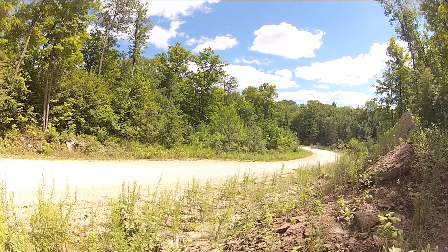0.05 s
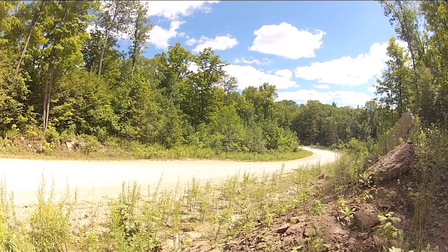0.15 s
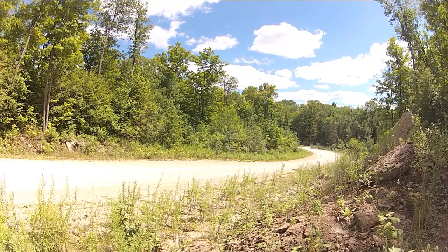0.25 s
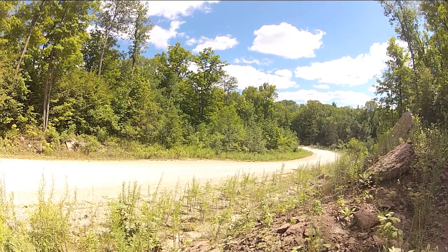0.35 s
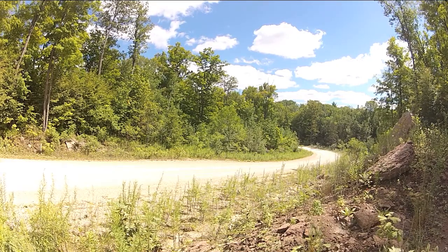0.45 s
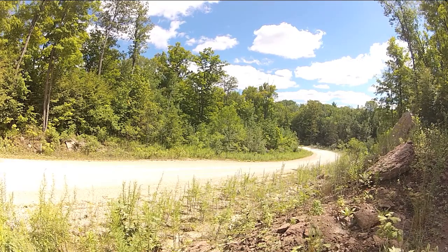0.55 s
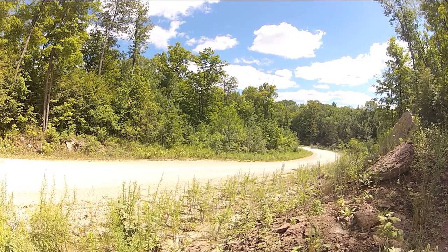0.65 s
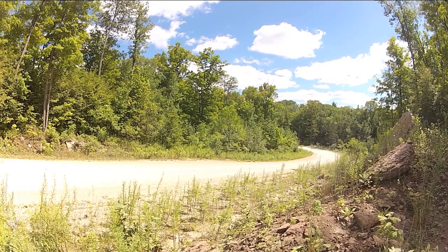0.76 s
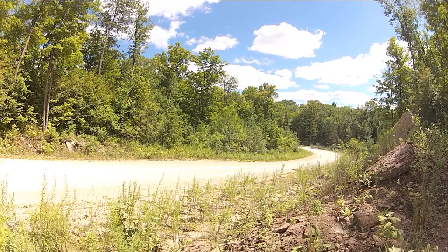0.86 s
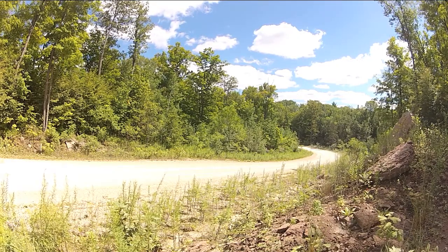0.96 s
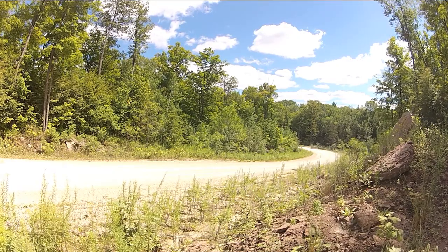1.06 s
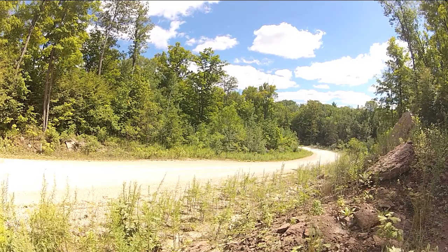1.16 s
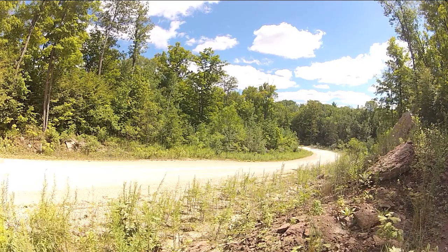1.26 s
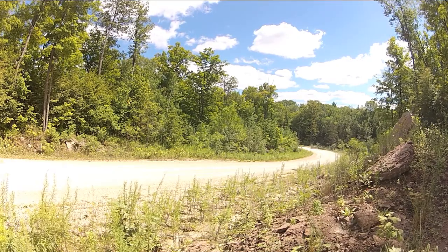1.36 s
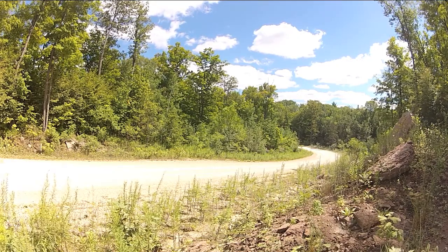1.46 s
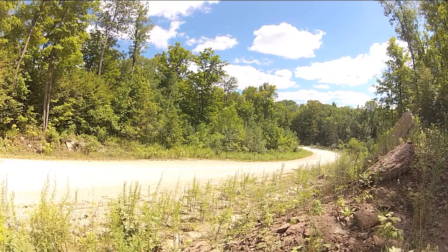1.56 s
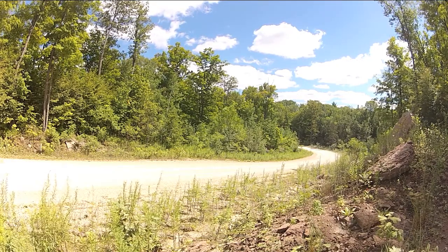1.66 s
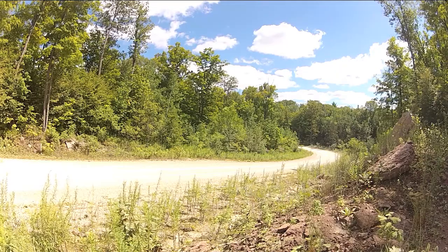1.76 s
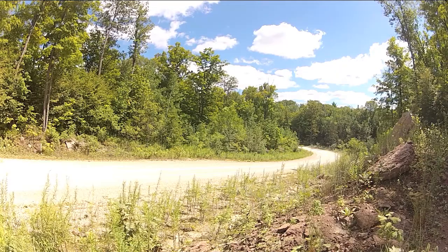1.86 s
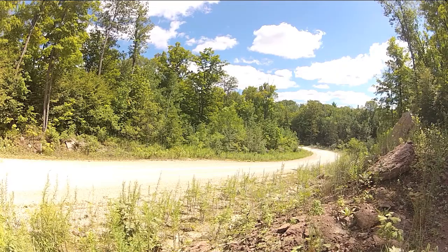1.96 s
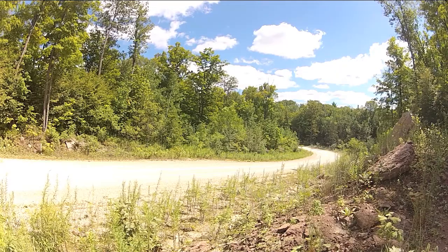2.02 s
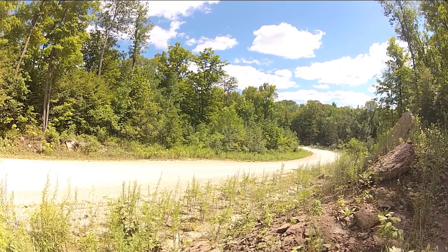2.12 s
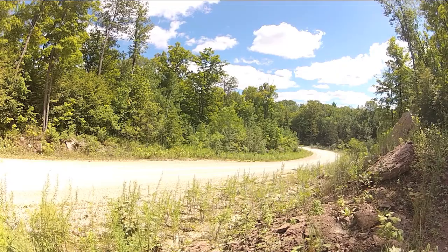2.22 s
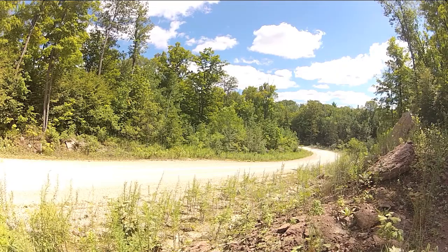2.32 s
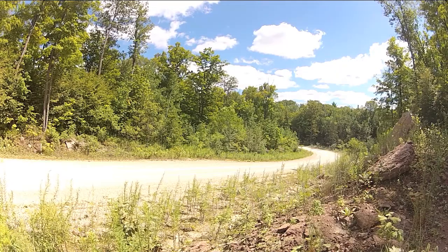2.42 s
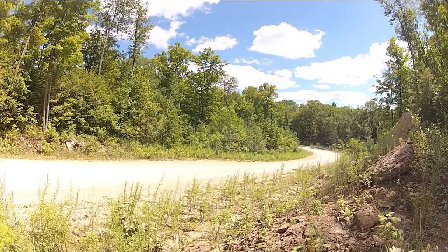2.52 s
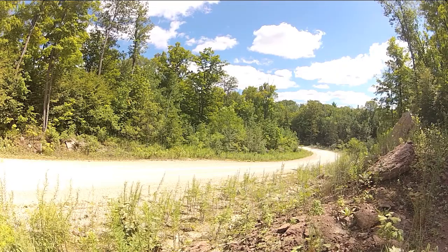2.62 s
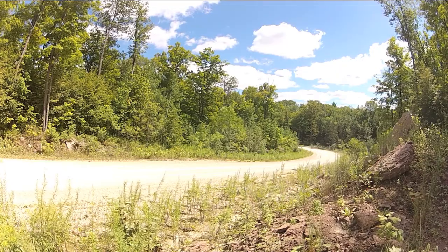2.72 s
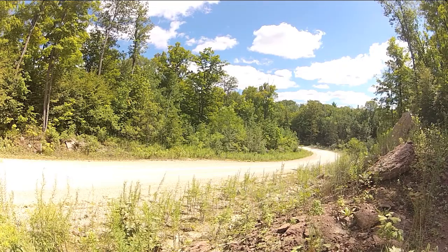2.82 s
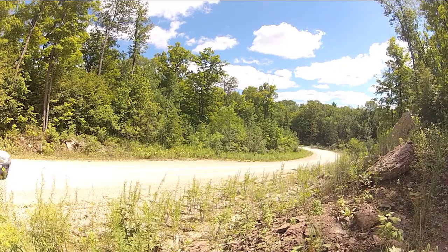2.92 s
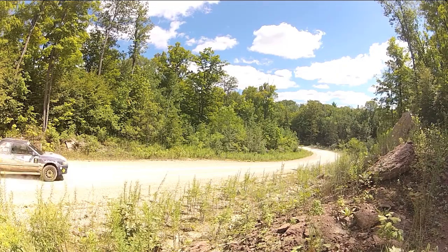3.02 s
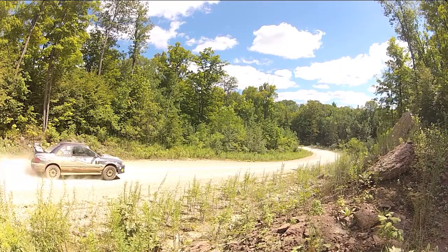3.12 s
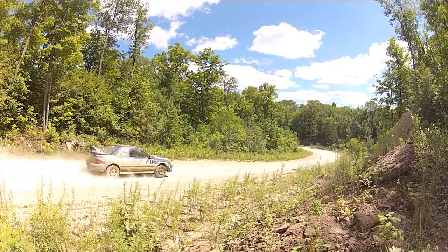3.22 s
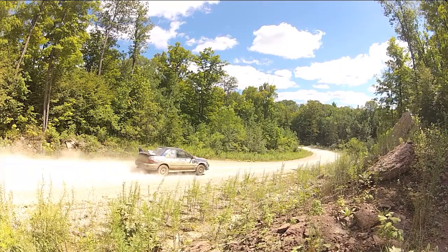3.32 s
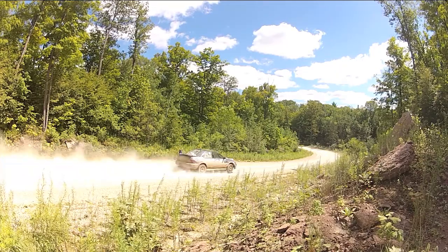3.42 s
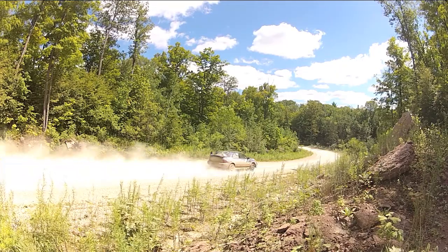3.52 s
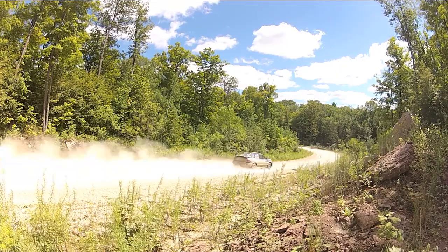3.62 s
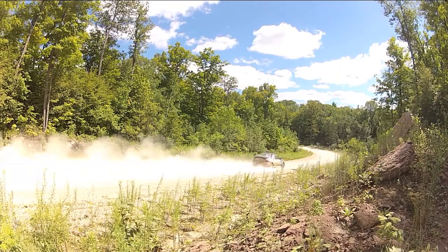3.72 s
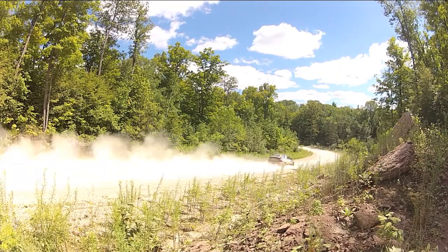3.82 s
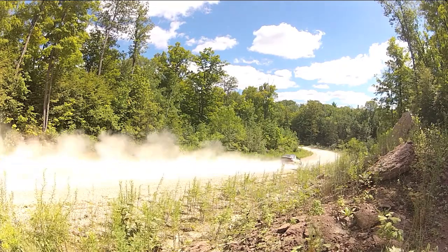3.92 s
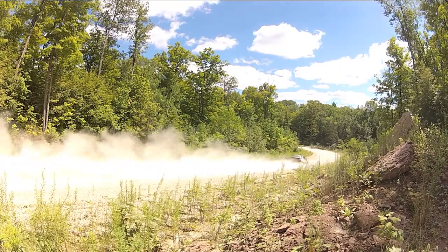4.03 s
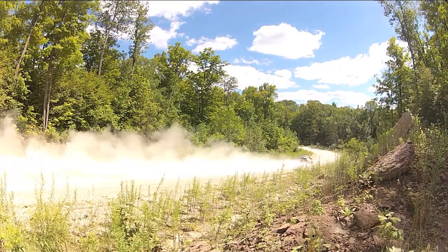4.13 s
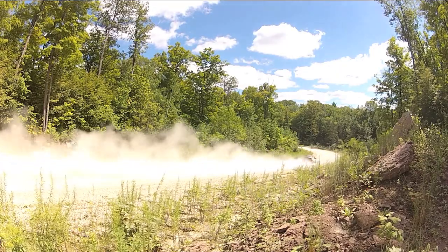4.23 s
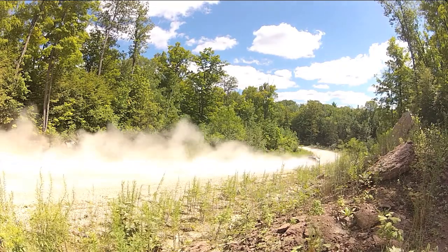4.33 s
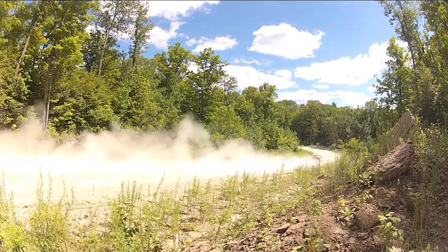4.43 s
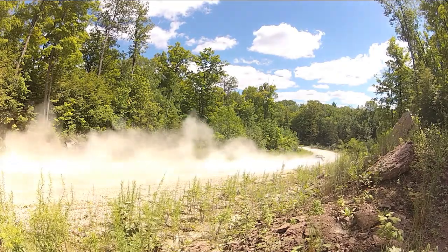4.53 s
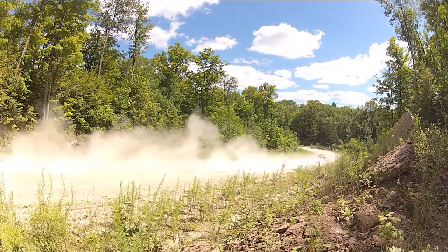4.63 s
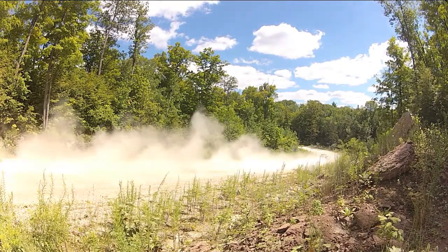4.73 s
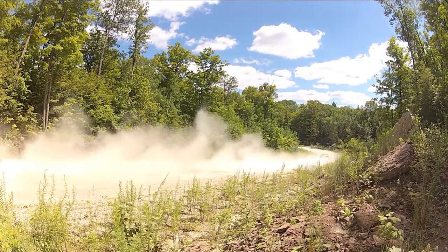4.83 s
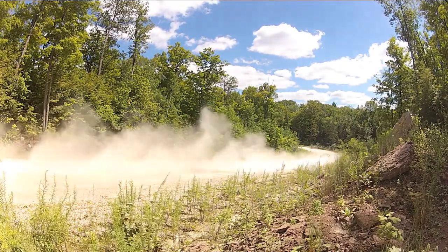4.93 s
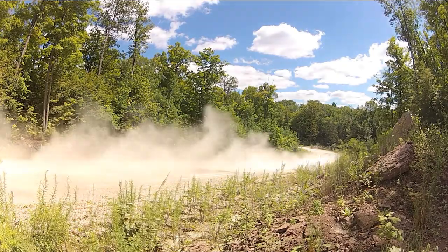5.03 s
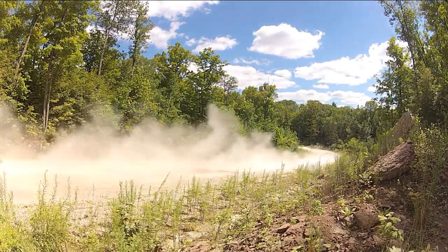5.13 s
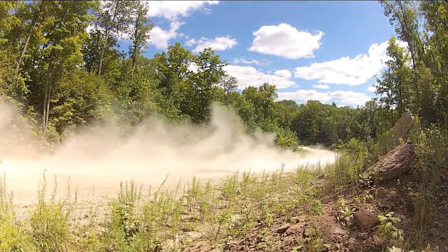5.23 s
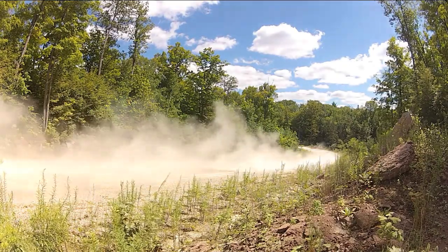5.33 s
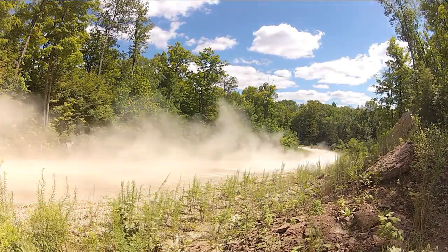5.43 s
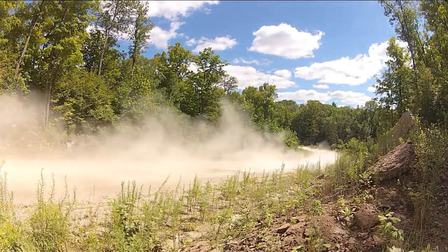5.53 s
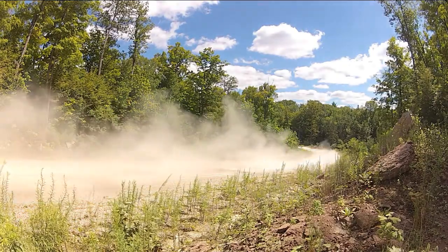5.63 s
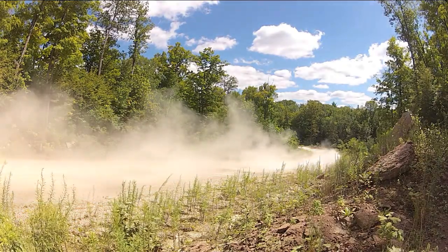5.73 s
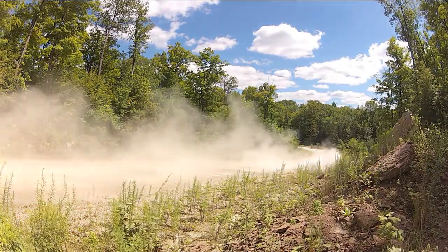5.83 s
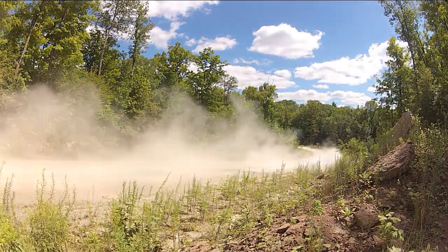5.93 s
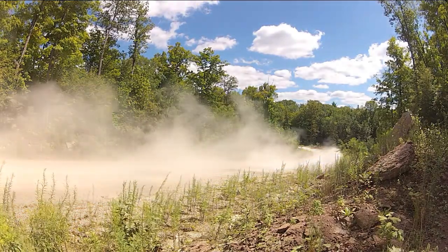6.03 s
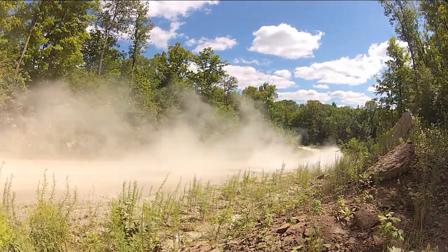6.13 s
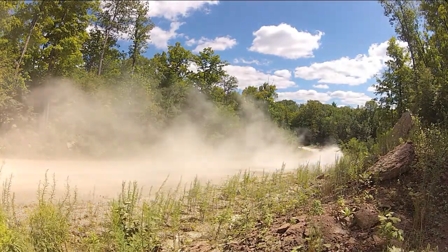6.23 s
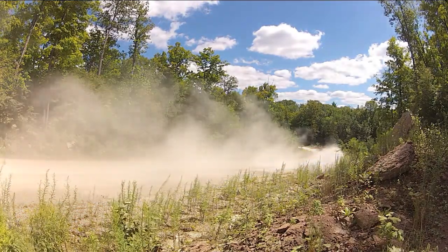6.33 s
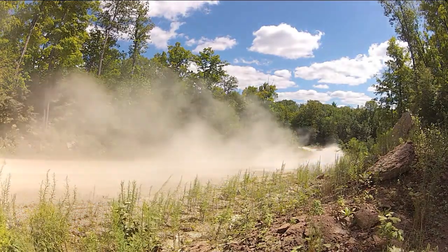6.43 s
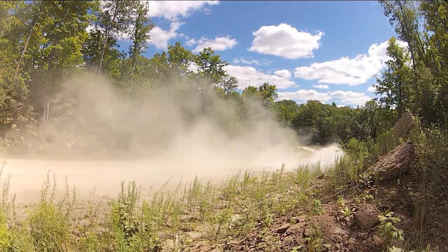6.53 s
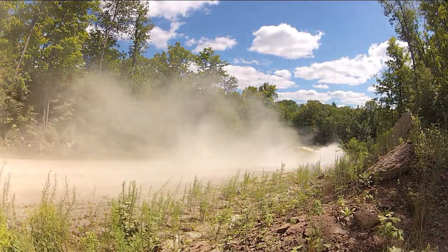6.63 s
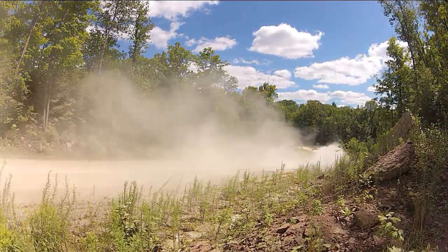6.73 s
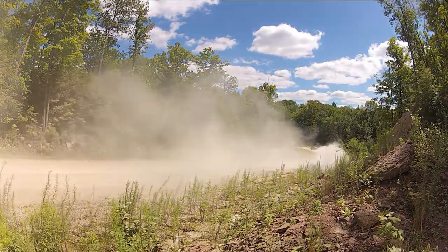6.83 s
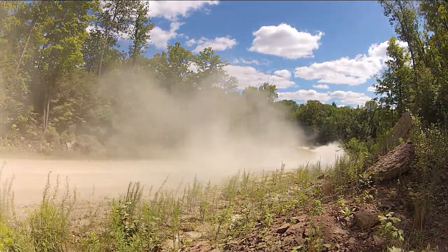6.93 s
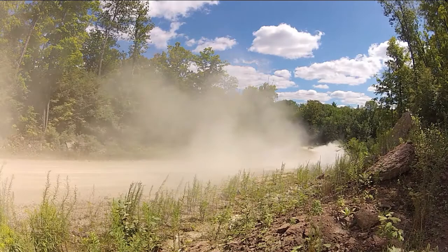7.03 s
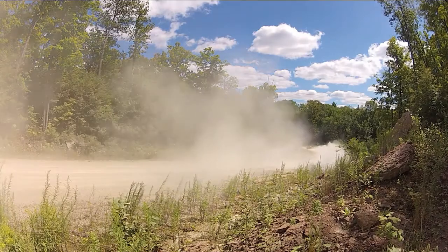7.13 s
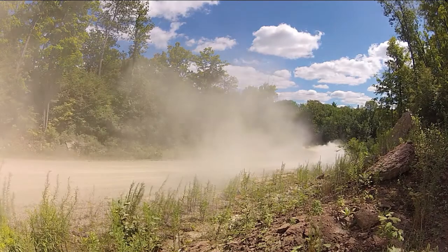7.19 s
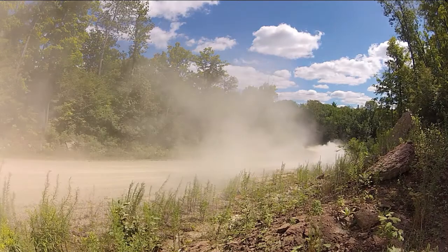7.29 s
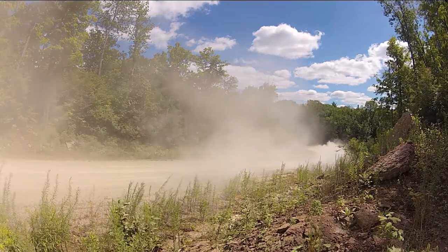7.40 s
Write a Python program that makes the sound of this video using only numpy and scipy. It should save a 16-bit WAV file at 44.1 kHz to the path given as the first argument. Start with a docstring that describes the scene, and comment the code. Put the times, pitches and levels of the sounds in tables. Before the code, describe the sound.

A four-cylinder rally car approaches along a gravel forest road, its distant engine note dipping, then growing into a deep boom. It goes to full throttle and passes close to the roadside microphone, tyres churning gravel and exhaust crackling harshly. The driver lifts off, and the exhaust burbles and spits. The engine falls in pitch as it recedes, giving one more short burst before fading toward the soft hush of the trees.

```python
"""A four-cylinder rally car comes up a gravel forest road, its exhaust booming at the rate the cylinders
fire and barking in pulses that the trees scatter. At about 2 s it goes to full throttle, tyres churning
gravel, and near 3 s it passes close; the camera adds a thin whine to the loud bass. The tailpipe now faces
us and cracks, one cylinder louder than the rest. Just before 4 s the driver lifts off and the exhaust
burbles and spits. The car drives away into the hush of the trees, with one more burst near 6 s."""
import sys
import numpy as np
from scipy import signal
from scipy.fft import rfft, irfft, next_fast_len
from scipy.io import wavfile
from scipy.ndimage import uniform_filter1d, map_coordinates

SR = 44100
rng = np.random.default_rng(int(sys.argv[2]) if len(sys.argv) > 2 else 0)


def to_wav(s):
    """Save 16-bit WAV."""
    ch = np.atleast_2d(s).T  # columns
    pcm = np.round(np.clip(ch, -1, 1) * 32767)  # PCM
    wavfile.write(sys.argv[1], SR, pcm.astype(np.int16))


N = 328981
TIME = np.arange(N) / SR
FREQS = np.fft.rfftfreq(N, 1 / SR)
CUTOFF_HZ = 15500


def amp(db):
    """Turns decibels into a number to multiply by."""
    return 10 ** (np.asarray(db) / 20)


def unit(x):
    """Scales a sound so its average strength (rms) is 1."""
    return x / np.sqrt(np.mean(x ** 2) + 1e-20)


def steady(x, span_s=0.2):
    """Evens out slow changes in loudness, holding the strength near 1."""
    size = max(int(span_s * SR), 64)
    return x / np.sqrt(abs(uniform_filter1d(uniform_filter1d(x ** 2, size), size)) + 1e-12)


def curve(rows):
    """Joins (time, value) points with straight lines."""
    return np.interp(TIME, *np.transpose(rows))


def colour(x, points):
    """Shapes a sound's tone with (pitch_hz, gain_db) points."""
    size = next_fast_len(N)
    hz, db = np.transpose(points)
    gain = amp(np.interp(np.log(np.fft.rfftfreq(size, 1 / SR) + 1), np.log(hz), db))
    return irfft(rfft(x, size) * gain, size)[:N]


def wander(rate_hz):
    """A smooth random wobble of strength 1, up to about the given rate."""
    knots = rng.standard_normal(8192)
    return unit(map_coordinates(knots, [TIME * 2 * rate_hz], order=2, mode="wrap"))


def blend(a, b, share):
    """Mixes two sounds; share is the part of the power that a gets."""
    share = np.clip(share, 0, 1)
    return np.sqrt(share) * a + np.sqrt(1 - share) * b


def decay(x, seconds):
    """Gives every click a fading tail."""
    return signal.lfilter([1], [1, -np.exp(-1 / (seconds * SR))], x)


def gate(start, end, rise_s, fall_s):
    """1 between two moments and 0 outside, with straight ramps."""
    return np.clip(.5 + np.minimum((TIME - start) / rise_s, (end - TIME) / fall_s), 0, 1)


def bump(s, half_s):
    """A smooth rise to 1 and back around one moment."""
    return np.exp(-((TIME - s) / half_s) ** 2)


# How fast the cylinders fire as the car comes, passes and leaves: time_s, firing_hz
FIRING_RATE = [(0, 213.4), (.25, 213), (.33, 217.9), (.49, 221.2), (.9, 197.9), (1.09, 188.3), (1.16, 172),
               (1.28, 162.4), (1.55, 178.5), (1.7, 174.2), (1.87, 184.9), (2.28, 184.2), (2.42, 189.6),
               (2.64, 189.1), (2.92, 193.6), (3.1, 193.7), (3.2, 192.5), (3.45, 192.5), (3.75, 190.6),
               (3.775, 175.7), (3.9, 178), (4, 184.4), (4.18, 182.9), (4.35, 173.5), (4.52, 160.6),
               (5.05, 143.1), (5.17, 133.7), (5.42, 137), (5.7, 146.4), (6.22, 157.4), (6.32, 145.6),
               (6.6, 141.1), (7.46, 126.5)]

def crank(waver=.002, strong_s=3.4155):
    """Counts the engine's firings; every fourth is the cylinder that cracks loudest."""
    count = np.cumsum(curve(FIRING_RATE) * (1 + waver * wander(18))) / SR
    return count - np.interp(strong_s, TIME, count)


# When the pedal is right down: start_s, end_s, build_s
FULL_THROTTLE = [(2.053, 3.756, 0.31), (5.905, 6.235, .04)]

def drive_past(closest_s=3.08, speed_m_per_s=23.3, closest_m=13.6, swing_s=0.13, reach_m=34.6):
    """Four 0-1 controls: throttle, being past us, tailpipe beaming at us, sound arriving directly."""
    throttle = sum(gate(start, end, build_s, fall_s=0.012) for start, end, build_s in FULL_THROTTLE)
    metres = np.hypot(closest_m, speed_m_per_s * (TIME - closest_s))
    past = .5 + .5 * np.tanh((TIME - closest_s) / (2 * swing_s))
    in_reach = 1 / (1 + (metres / reach_m) ** 4)
    facing = past * in_reach * (0.17 + 0.79 * throttle)  # the pipe beams backwards, most on throttle
    in_view = gate(2, 6.24, rise_s=0.37, fall_s=0.37)  # clear of the trees between two bends
    direct = in_view * (0.73 * (closest_m / metres) ** 0.3 + 0.14 * facing)
    return throttle, past, np.clip(facing, 0, 1), np.clip(direct, 0, 1)


# Base loudness of the exhaust's deep tone: time_s, level_db
BOOM_LEVEL = [(0, -32.5), (.27, -38), (.36, -45.5), (.9, -44), (1.3, -33.5), (1.5, -20.5), (1.66, -16),
              (1.8, -19.5), (2.25, -19), (2.72, -11), (3, -10.5), (3.14, -16.5), (3.7, -19), (4.5, -26),
              (5.1, -23), (5.88, -25.5), (5.94, -17.5), (6.19, -18.5), (6.3, -34), (6.56, -28.5),
              (7.46, -34.5)]
# Brief dips and swells as the car moves among the trees: time_s, half_length_s, change_db
TREE_SWELLS = [(1.39, 0.029, 2), (1.453, .018, -10), (1.785, 0.016, -5), (1.98, .03, -5),
               (2.038, 0.015, 8.5), (2.102, .04, -0.5), (5.118, 0.062, 1.5), (5.194, .03, -4)]

def boom(count, direct, facing, past, flutter_coming=0.26, flutter_going=0.19):
    """The pipe's deep tone and its octave, which is beamed backwards; echoes make both flutter."""
    far = np.sqrt(1 - direct)
    deep_db = curve(BOOM_LEVEL) + sum(db * bump(s, half_s) for s, half_s, db in TREE_SWELLS)
    octave_db = deep_db - 13 - 3 * past + 11 * facing
    flutter = far * (flutter_coming * (1 - past) + flutter_going * past)
    out = np.zeros(N)
    for multiple, level_db in enumerate([deep_db, octave_db], 1):
        tone = -np.cos(multiple * (2 * np.pi * count + .2 * far * wander(12)))
        out += amp(level_db) * unit(tone * (1 + multiple * flutter * wander(14)))
    return out


# The tones in the throb: multiple_of_firing_rate, relative_db, extra_when_facing_db
THROB_TONES = [(.25, -21, 17.5), (.5, -1, -5), (.75, 2.5, -2), (1.25, -2, 3), (2.25, -9, 9),
               (2.5, -4.5, -13), (3.25, -11.5, 13), (3.5, -3, -19)]

def throb(count, direct, facing, level_db):
    """Unequal cylinders add tones at quarter steps of the firing rate, blurred by echoes."""
    far = .7 * np.sqrt(1 - direct)
    tones = np.zeros(N)
    for multiple, db, facing_db in THROB_TONES:
        sway = 1 + far * (wander(15) + 1j * wander(6.6))  # wobbles both loudness and timing
        tones -= amp(db + facing_db * facing) * (sway * np.exp(2j * np.pi * multiple * count)).real
    return amp(level_db) * steady(tones)


# The four cylinders in firing order: pulse_db, shock_db, jet_db, lateness_in_firings
CYLINDERS = [(1, 2.5, 0, -0.013), (-4.5, -13.5, -9.5, 0.0029), (6.5, -4.5, -15, 0.012),
             (2, -6, -22, -0.0023)]

def firings(count, part, scatter_db, jitter=0.0092):
    """One click a firing for the pulse, shock or jet; cylinder and chance set its size and timing."""
    pulse_db, shock_db, jet_db, lateness = np.transpose(CYLINDERS)
    cylinder_db = {"pulse": pulse_db, "shock": shock_db, "jet": jet_db}[part]
    number = np.arange(np.ceil(count[0]) + 1, count[-1] - 1).astype(int)
    cylinder = number % len(CYLINDERS)
    loud, late = rng.standard_normal((2048, 2))[:len(number)].T
    at = np.interp(number + lateness[cylinder] + jitter * late, count, np.arange(N))
    clicks = np.zeros(N)
    clicks[np.round(at).astype(int)] = amp(cylinder_db[cylinder] + scatter_db * loud)
    return clicks


def forest(x, ring_s=0.74, echoes_per_s=2000):
    """Trunks and leaves scatter the sound into many small, dying echoes."""
    echoes = rng.standard_normal(SR) * (rng.random(SR) < echoes_per_s / SR)
    fade = amp(-60 * TIME[:SR] / ring_s)
    return steady(signal.fftconvolve(x, echoes * fade)[:N])


# Tone of the bark's low body: pitch_hz, gain_db
BODY_TONE = [(210, -50), (260, -8), (310, -17), (385, -2.5), (440, 2.5), (490, -1), (575, 3), (650, -3.5),
             (740, -12), (900, -43)]
# Tone of the bark's higher, harder edge: pitch_hz, gain_db
EDGE_TONE = [(520, -74), (620, -1.5), (690, 1.5), (780, 5), (960, 1.5), (1150, -5.5), (1400, -14),
             (1800, -24), (2600, -57)]

def bark(count, direct, body_db, edge_db, puff_s=0.0069, flutter_db=1.46):
    """Pressure pulses and swirling puffs leave the tailpipe, heard directly and, rougher, off the trees."""
    roughness = 0.53 * (1 - direct) ** 1.3
    out = np.zeros(N)
    for tone, level_db, part in [(BODY_TONE, body_db, "pulse"), (EDGE_TONE, edge_db, "shock")]:
        pulses = -firings(count, part, scatter_db=0.8)
        puffs = decay(pulses, puff_s) * rng.standard_normal(N)
        straight, scattered, swirling = (steady(colour(x, tone)) for x in (pulses, forest(pulses), puffs))
        arriving = blend(straight, scattered, direct)
        wobble_db = flutter_db * (1 - direct) * wander(8.7)
        out += amp(level_db + wobble_db) * steady(blend(swirling, arriving, roughness))
    return out


# Base loudness of the tyre and air rumble: time_s, level_db
RUMBLE_LEVEL = [(0, -43), (1.1, -39), (1.9, -28), (2.92, -25.5), (3.16, -41), (3.75, -34), (4.15, -33),
                (4.85, -38), (7.46, -43)]
# Tone of that rumble: pitch_hz, gain_db
RUMBLE_TONE = [(20, -31), (40, -12.5), (60, -15), (100, -6), (160, -3), (250, -10.5), (400, -9),
               (800, -49.5)]
# A steady hum far away: pitch_hz, level_db
DISTANT_HUM = [(64.6, -44)]

def rumble(swell_db, boost_db=2):
    """Low roar of tyres and air, over a steady distant hum."""
    noise = unit(colour(rng.standard_normal(N), RUMBLE_TONE))
    road = amp(curve(RUMBLE_LEVEL) + swell_db + boost_db) * noise
    hum_hz, hum_db = DISTANT_HUM[0]
    hum = np.sin(2 * np.pi * hum_hz * TIME + .25 * wander(3.8))
    return road + amp(hum_db) * unit(hum)


# Tone of the forest's hush: pitch_hz, gain_db
HUSH_TONE = [(200, -23), (520, -0.5), (950, 2), (1400, -11.5), (2500, -23), (6000, -38), (15000, -55)]

def hush(level_db=-52):
    """The soft, steady noise of the trees, heard when the car is far."""
    return amp(level_db) * unit(colour(rng.standard_normal(N), HUSH_TONE))


# Tone of churned gravel, also used for the exhaust's spits: pitch_hz, gain_db
GRIT_TONE = [(500, -27), (1100, 1), (1500, 1.5), (2200, 0), (3400, -3), (4700, -6), (6500, -9.5),
             (9500, -12), (12500, -13), (14000, -17), (15300, -31)]

def gravel(count, stones_per_s=700, spread_db=2.5, stone_s=0.0014, pulsing=0.039):
    """Stones tick under the tyres in a wash of grit and exhaust hiss that pulses with the engine."""
    sizes = amp(spread_db * np.minimum(rng.exponential(1, N), 4))
    hits = sizes * (rng.random(N) < stones_per_s / SR)
    stones = unit(decay(hits, stone_s) * rng.standard_normal(N))
    wash = unit(rng.standard_normal(N) * (1 + pulsing * np.cos(2 * np.pi * count)))
    return unit(colour(blend(stones, wash, share=0.3), GRIT_TONE))


# Base loudness of the exhaust and gravel roar; bark and throb follow it too: time_s, level_db
ROAR_LEVEL = [(0, -43), (.48, -40), (.91, -51.5), (1.14, -45.5), (1.31, -47.5), (1.58, -38.5), (1.85, -38),
              (2.16, -32.5), (2.66, -26), (2.99, -29), (3.47, -23.5), (3.745, -29), (3.78, -34.5),
              (4.1, -44), (5.13, -56.5), (5.85, -56.5), (5.98, -51), (6.94, -58.5)]
# How a long way through the air changes the tone: pitch_hz, gain_db
FAR_TONE = [(1200, 1), (2200, 2.5), (3500, -0.5), (7000, 2.5), (12000, 0), (15000, -10)]

def rasp(count, facing, boost_db=1, near_db=-45, fade_db=10):
    """Gravel, plus crack when the pipe faces us; the fainter they are, the more top treble the air takes."""
    level_db = curve(ROAR_LEVEL)
    sound = blend(crack(count), gravel(count), facing)
    far = np.clip((near_db - level_db) / fade_db, 0, 1)
    return amp(level_db + boost_db) * ((1 - far) * sound + far * colour(sound, FAR_TONE))


# How body, edge and throb follow the roar, by name:
# offset_db, db_per_roar_db, extra_direct_db, extra_throttle_db, extra_past_db
EXHAUST_VOICES = {"body": (-7, 0.7053, 4, 3, 1.2), "edge": (-17, .55, 5.5, 7, 0),
                  "throb": (-15.5, 0.8, 8, 0, 5)}

def voice_level(name, direct, throttle, past):
    """Loudness in dB of one voice of the exhaust, from the roar, the pedal and the car's place."""
    db, follow, direct_db, throttle_db, past_db = EXHAUST_VOICES[name]
    return db + follow * curve(ROAR_LEVEL) + direct_db * direct + throttle_db * throttle + past_db * past


# Two sliding dips in the tone, one list for each: time_s, pitch_hz, gain_db
GROUND_DIPS = [
    [(2.2, 340, 0), (2.45, 372, -9.5), (2.78, 452, -2.5), (3.04, 574, -7.5), (3.2, 600, 0)],
    [(2.9, 1900, 0), (3.12, 1500, -4), (3.3, 1050, -11), (3.44, 880, -3)],
]

def ground_reflection(x, widths_octaves=(0.23, 0.4)):
    """Sound bouncing off the ground cancels two bands of pitch that slide as the car passes."""
    hz, times, spectrum = signal.stft(x, SR, nperseg=1024, noverlap=768)
    for rows, width in zip(GROUND_DIPS, widths_octaves):
        at, *columns = np.transpose(rows)
        centre_hz, gain_db = (np.interp(times, at, column) for column in columns)
        octaves_away = np.log2((hz[:, None] + 1) / centre_hz)
        spectrum = spectrum * amp(gain_db * np.exp(-(octaves_away / width) ** 2))
    return signal.istft(spectrum, SR, nperseg=1024, noverlap=768)[1][:N]


def sweep(clicks, length_s):
    """Draws each click out into a short rising sweep, the same every time."""
    return irfft(rfft(clicks) * np.exp(-1j * np.pi * length_s * FREQS ** 2 / CUTOFF_HZ), N)


# Tone of the shock waves from the tailpipe: pitch_hz, gain_db
SHOCK_TONE = [(900, -50), (1400, 7.5), (2200, 3), (3500, 5.5), (5000, -3.5), (7000, -10.5), (10000, -9),
              (12500, -2), (15500, -24)]
# Tone of the gas jet behind each shock: pitch_hz, gain_db
JET_TONE = [(900, -6), (1500, -19), (2600, -3), (3500, 10), (4500, 8.5), (5600, -13), (7500, -9),
            (10000, -26), (12000, -7), (14000, -29), (15500, -18)]

def crack(count, shock_s=0.000992, bounce_s=0.000884, bounce_gain=0.39, jet_s=0.0013):
    """Each pulse sharpens to a shock that also bounces off the road; one cylinder's jet tears loudest."""
    shocks = sweep(-firings(count, "shock", scatter_db=-4.1, jitter=0), shock_s)
    bounce = np.interp(TIME - bounce_s, TIME, shocks)
    front = steady(colour(shocks + bounce_gain * bounce, SHOCK_TONE))
    bursts = firings(count, "jet", scatter_db=2.5, jitter=0)
    tear = steady(colour(sweep(bursts, length_s=.004), JET_TONE))
    hiss = steady(colour(decay(bursts, jet_s) * rng.standard_normal(N), JET_TONE))
    jet = blend(tear, hiss, share=0.85)
    return steady(blend(front, jet, share=.55))


# Loudness changes as the pedal lifts: time_s, half_length_s, throb_db, rumble_db, bark_db
LIFT_OFF = [(3.795, 0.026, -3, 0, -11), (3.96, 0.062, 5, 9.6, 1.5), (4.124, 0.065, 4, 2.5, 3.5)]

def burble():
    """The exhaust dips as the driver lifts off, then swells twice: dB curves for throb, rumble and bark."""
    return sum(np.outer(extra_db, bump(s, half_s)) for s, half_s, *extra_db in LIFT_OFF)


# The exhaust spitting as the car coasts: start_s, level_db
EXHAUST_SPITS = [(4.12, -13.5), (4.143, -15), (4.1639, -18)]

def spits(fade_s=0.00078):
    """A few sharp snaps from the tailpipe with the throttle shut."""
    clicks = np.zeros(N)
    for start_s, level_db in EXHAUST_SPITS:
        clicks[round(start_s * SR)] = amp(level_db)
    return colour(decay(clicks, fade_s) * rng.standard_normal(N), GRIT_TONE)


def scene():
    """One engine, one pedal and one path drive the exhaust, heard over the road and the trees."""
    count = crank()
    throttle, past, facing, direct = drive_past()
    body_db, edge_db, throb_db = (voice_level(name, direct, throttle, past)
                                  for name in ("body", "edge", "throb"))
    throb_swell, rumble_swell, bark_swell = burble()
    car = boom(count, direct, facing, past)
    car += throb(count, direct, facing, throb_db + throb_swell)
    car += bark(count, direct, body_db + bark_swell, edge_db + bark_swell)
    car += rasp(count, facing)
    return (ground_reflection(car) + spits() + rumble(rumble_swell) + hush())[None]


# Narrow cuts the camera makes in the treble: pitch_hz, width_hz, gain_db
TREBLE_CUTS = [(3993, 278, -12), (8220, 300, -24), (12010, 220, -17)]

def record(dry, mirror_hz=8000, bass_below_hz=950):
    """The camera rounds tall peaks, cuts into the treble and mirrors the bass up high as a thin whine."""
    rounded = dry[0] / (1 + (dry[0] / .92) ** 8) ** (1 / 8)
    cuts_db = sum(db * np.exp(-((FREQS - hz) / width) ** 2) for hz, width, db in TREBLE_CUTS)
    sound = irfft(rfft(rounded) * amp(cuts_db), N)
    bass = signal.sosfilt(signal.butter(6, bass_below_hz, fs=SR, output="sos"), sound)
    slope = np.gradient(bass) * SR / (np.pi * mirror_hz)  # higher notes are mirrored more strongly
    whine = slope * np.sin(2 * np.pi * mirror_hz * TIME)
    lowpass = signal.firwin(511, CUTOFF_HZ, window=("kaiser", 9), fs=SR)
    return signal.oaconvolve(sound + whine, lowpass, "same")[None]


dry = scene()
out = record(dry)
to_wav(out)
```